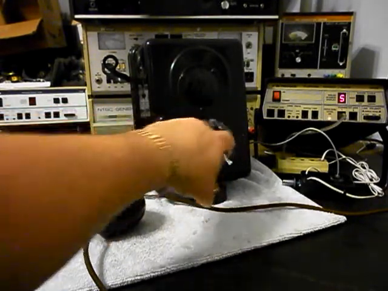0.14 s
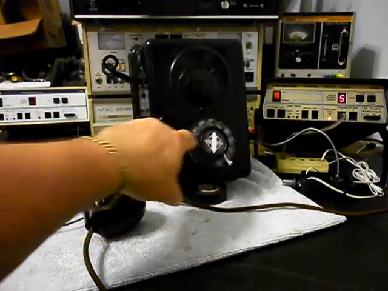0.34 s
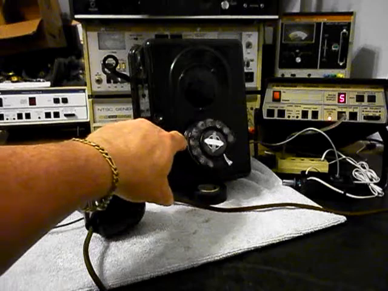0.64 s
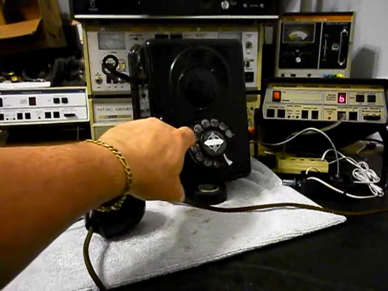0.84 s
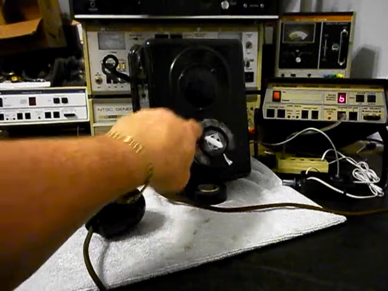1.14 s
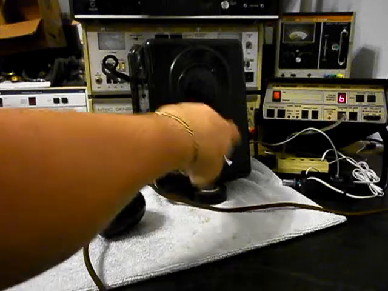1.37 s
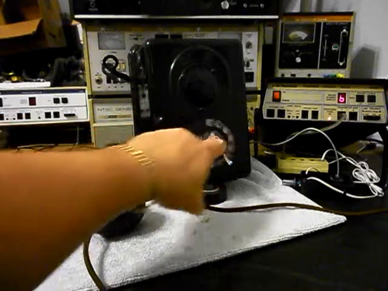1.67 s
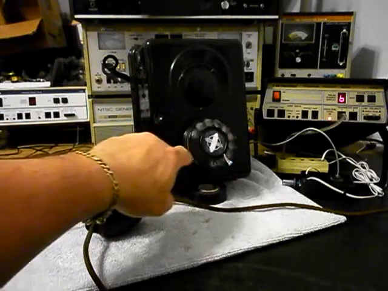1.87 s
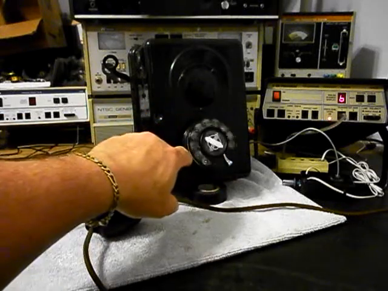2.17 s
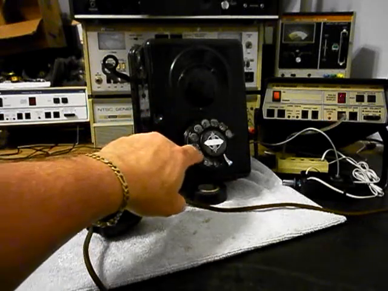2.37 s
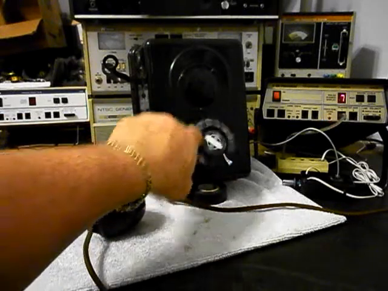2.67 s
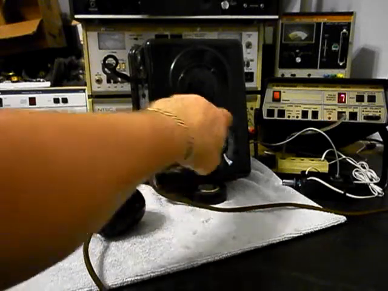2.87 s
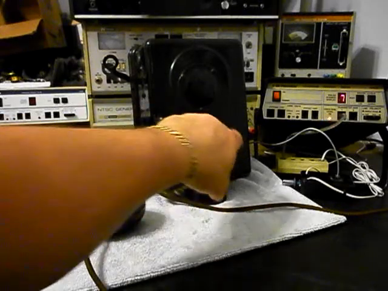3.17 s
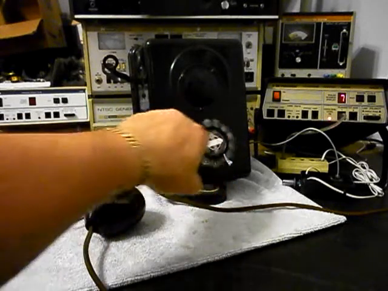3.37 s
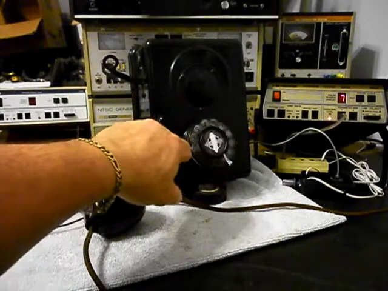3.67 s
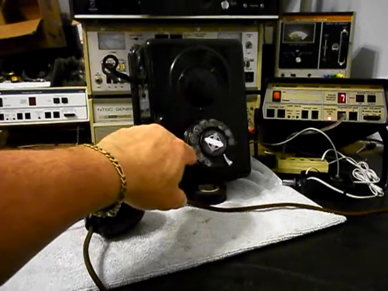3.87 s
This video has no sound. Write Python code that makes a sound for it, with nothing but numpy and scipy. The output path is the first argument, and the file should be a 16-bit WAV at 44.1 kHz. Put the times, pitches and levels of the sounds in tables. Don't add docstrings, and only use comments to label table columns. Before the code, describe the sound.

An old rotary telephone dial is wound and released digit by digit, clicking ratchet, hard knock, rapid ticking whir home, double-click stop, faint hiss.

```python
import sys
import numpy as np
from scipy import signal
from scipy.fft import rfft, irfft
from scipy.io import wavfile
from scipy.ndimage import uniform_filter1d

SR = 44100
rng = np.random.default_rng(int(sys.argv[2]) if len(sys.argv) > 2 else 0)


def generate_wav(sig):
    pcm = np.round(np.clip(np.atleast_2d(sig).T, -1, 1) * 32767).astype(np.int16)
    wavfile.write(sys.argv[1], SR, pcm)


def linear_from_db(decibels):
    return 10 ** (np.asarray(decibels, float) / 20)


N = 176744
LEAD = 4410

# first contact pulse in seconds, first gap in seconds, number of pulses.
RETURNS = [
    (-.012, .09106, 7),
    (1.488, .09093, 8),
    (3.069, .09007, 9),
]
# plain tooth in dB, contact tooth in dB, case boom relative to the tooth in dB, whir in dB.
GEARS = [(-28, -26.5, -17, -48), (-25.5, -24, -13, -46.5), (-26, -22.5, -20, -45)]
# stop in seconds, its peak in dB, delay of the rebound in seconds, peak of the rebound in dB.
STOPS = [(.634, -7.5, .015, -7), (2.2296, -6.5, .0137, -4.5), (3.8979, -5.5, .0141, -4.5)]


def evened(x):
    return x / np.sqrt(np.mean(x ** 2) + 1e-20)


def read(points, hz):
    f, value = np.transpose(points)
    return np.interp(np.log(hz + 1), np.log(f + 1), value)


def colour(x, points):
    hz = np.fft.rfftfreq(len(x), 1 / SR)
    gain = linear_from_db(read(points, hz)) * (hz <= points[-1][0])
    return irfft(rfft(x) * gain, len(x))


def add(mix, s, sound):
    part = mix[LEAD + round(s * SR):][:len(sound)]
    part += sound[:len(part)]


def alike(rows, kind):
    boom_db, t60, tilt_db, ring_db = kind
    return [(s, db, boom_db, t60, tilt_db, db + ring_db) for s, db in rows]


def strike(rows, rise_s):
    forces = np.zeros((3, N + LEAD))
    t = np.arange(4096) / SR
    hz = np.fft.rfftfreq(len(t), 1 / SR)
    octaves = np.log2(np.clip(hz, 1500, 8000) / 3500)
    slow_part = np.exp(-((hz - 800) / 750) ** 2)
    for s, db, boom_db, t60, tilt_db, ring_db in rows:
        sharp, slow = rng.standard_normal((2, len(t)))
        sharp = irfft(rfft(sharp) * linear_from_db(tilt_db * octaves))
        slow = irfft(rfft(slow) * slow_part)
        shape = linear_from_db(-60 * t / max(t60, .004)) * np.minimum(t / rise_s, 1)
        energy = linear_from_db(db) * np.linalg.norm(shape) / np.sqrt(len(t))
        add(forces[0], s, 0.52 * energy * evened(sharp * shape))
        add(forces[1], s, 0.19 * energy * linear_from_db(boom_db + 4) * evened(slow * shape))
        add(forces[2], s, linear_from_db(ring_db) * np.hanning(14))
    return forces


def sliding(tables, grain_db):
    forces = np.zeros((2, N + LEAD))
    for rows in tables:
        s, db, dull_db = np.transpose(rows)
        t = np.arange(s[0], s[-1], 1 / SR)
        sharp, dull, catches = rng.standard_normal((3, len(t)))
        grain = linear_from_db(grain_db * evened(uniform_filter1d(catches, 90)))
        level = linear_from_db(np.interp(t, s, db)) * signal.windows.tukey(len(t), .03)
        add(forces[0], s[0], evened(sharp * grain) * level)
        add(forces[1], s[0], evened(dull * grain) * level * linear_from_db(np.interp(t, s, dull_db)))
    return forces


def body(x, modes, broad_db, lo_hz, hi_hz, opposed=False):
    t = np.arange(8192) / SR
    ring = np.zeros(len(t))
    for k, (hz, width, db) in enumerate(modes):
        sign = (-1) ** (k * opposed)
        ring += sign * linear_from_db(db) * np.sqrt(width) * np.exp(-np.pi * width * t) * np.sin(2 * np.pi * hz * t)
    band = signal.butter(2, [lo_hz, hi_hz], "band", fs=SR, output="sos")
    broad = signal.sosfilt(band, 1. * (t == 0))
    both = ring / np.linalg.norm(ring) + linear_from_db(broad_db) * broad / np.linalg.norm(broad)
    return signal.oaconvolve(x, both / np.linalg.norm(both))[:len(x)]


def workshop():
    # frequency in Hz, level in dB per Hz.
    hiss = [(15, -29), (25, -24), (265, -1.5), (313, -6), (371, -2.5), (450, -8), (1900, -24), (2310, -15),
            (3930, -20.5), (6840, -35.5), (7900, -50.5), (10300, -68.5), (17400, -120)]
    # frequency in Hz, rms level in dB.
    hum = [(120.6, -63.5), (88, -71)]
    t = np.arange(N) / SR
    out = linear_from_db(-56) * evened(colour(rng.standard_normal(N), hiss))
    for hz, db in hum:
        waver = 1 + .45 * evened(uniform_filter1d(rng.standard_normal(N), 3000))
        out += np.sqrt(2) * linear_from_db(db) * waver * np.sin(2 * np.pi * hz * t)
    return out


def knocks():
    # slip in seconds, its peak in dB, knock in seconds, its peak in dB, shell ring in dB.
    releases = [(-.05, -5, -.018, -5, -5), (1.4436, -6.5, 1.4792, -.5, 2.5), (3.039, -5, 3.0626, 2.5, 3)]
    # time in seconds, peak in dB.
    chatters = [(-.008, -1), (1.380, -16), (1.488, -11), (3.016, -38), (3.029, -18)]
    # time in seconds,
    # peak in dB, case boom relative in dB, shell ring relative in dB.
    landings_and_bounces = [(1.3456, -27, 1, 9), (1.352, -8, -12, -6), (1.5104, -18, -15, 6), (2.9175, -30, 9, 19),
                            (2.9253, -38, 10, 17), (3.068, -16, 10, -6)]
    # case boom relative in dB, time to fall 60 dB in seconds,
    # brightness in dB per octave, shell ring relative in dB.
    stop = (-12, .026, -2, -20)
    rebound = (-16, .038, 2.5, -30)
    slip = (-23, .045, 3, -36)
    knock = (-12, .03, -.5, 0.3)
    chatter = (-22, .035, 4, -18)
    rows = alike([r[:2] for r in releases], slip)
    rows += [(s, db, *knock[:3], ring_db) for _, _, s, db, ring_db in releases]
    rows += alike(chatters, chatter)
    rows += [(s, db, boom_db, .04, 1.5, db + ring_db) for s, db, boom_db, ring_db in landings_and_bounces]
    rows += alike([r[:2] for r in STOPS], stop)
    rows += alike([(s + wait_s, db) for s, _, wait_s, db in STOPS], rebound)
    return strike(rows, rise_s=0.00097)


def teeth():
    jitter_s, spread_db = .0006, 1.2
    t60, tilt_db, shell_db = .045, -2.5, -45
    rows = []
    for (s, gap, pulses), (tooth_db, contact_db, boom_db, _) in zip(RETURNS, GEARS):
        turn = np.arange(1, 4 * pulses) / 4
        chance = rng.standard_normal((len(turn), 2)) * [jitter_s, spread_db]
        times = s + gap * turn + .0004 * turn ** 2 + chance[:, 0]
        fading_db = tooth_db - 4 * turn / pulses
        levels = np.where(turn % 1 == 0, contact_db, fading_db) + chance[:, 1]
        booms = boom_db + 9 * turn / pulses
        rows += [(at, db, boom, t60, tilt_db, shell_db) for at, db, boom in zip(times, levels, booms)]
    return strike(rows, rise_s=.0025)


def whir():
    tables = []
    for (s, *_), (home, *_), (*_, whir_db) in zip(RETURNS, STOPS, GEARS):
        share = np.linspace(0, 1, 9)
        start = s + .02
        times = start + share * (home - start)
        levels = whir_db - 4 * (2 * share - 1) ** 2
        dull_db = -5 + 6.5 * share
        tables.append(np.transpose([times, levels, dull_db]))
    return sliding(tables, grain_db=1.2)


def scrape():
    # time in seconds, level in dB.
    pulls = [
        [(.78, -68), (1.0, -76), (1.07, -57), (1.15, -68), (1.25, -61), (1.3, -65), (1.345, -48)],
        [(2.4, -62), (2.54, -68), (2.62, -55), (2.7, -52), (2.8, -59), (2.915, -50), (2.95, -68), (3.0, -66),
         (3.027, -42)],
    ]
    pull_dull_db = [3, -1]
    drag = [[(s, db, dull_db) for s, db in rows] for rows, dull_db in zip(pulls, pull_dull_db)]
    return sliding(drag, grain_db=2.2)


def ticks():
    # time in seconds, peak in dB.
    taps = [(.8104, -44), (.917, -46), (1.03, -42), (2.1689, -31), (2.4144, -47), (2.5485, -44),
            (3.7009, -38), (3.7677, -30)]
    clicks = [(.9222, -36), (1.034, -27), (1.062, -19), (1.0808, -17.5), (1.1711, -26), (1.214, -27),
              (1.2679, -36), (1.3073, -32)]
    grits = [(1.7453, -30), (2.1255, -32), (3.3267, -28), (3.7009, -29), (3.768, -26), (3.7917, -36)]
    soft_clicks = [(2.5635, -36), (2.593, -28), (2.6094, -30), (2.6583, -31), (2.6897, -34), (2.7466, -34),
                   (2.786, -28), (2.8329, -29), (2.8678, -32), (2.8997, -36)]
    # case boom relative in dB, time to fall 60 dB in seconds,
    # brightness in dB per octave, shell ring relative in dB.
    tap = (8, .05, -1, -6)
    ratchet = (-9, .028, 0.3, -24)
    grit = (-27, .11, 1.5, -20)
    soft_ratchet = (-13, .055, 1, -12)
    rows = alike(taps, tap) + alike(clicks, ratchet) + alike(grits, grit) + alike(soft_clicks, soft_ratchet)
    return strike(rows, rise_s=0.0023)


def room(x):
    # frequency in Hz, time to fall 60 dB in seconds.
    echo_times = [(300, 0.46), (1000, 0.37), (3000, 0.37), (7000, 0.38)]
    taps = np.zeros(SR // 2)
    at = np.arange(120, len(taps) - 12, 12)
    taps[at + rng.integers(0, 12, len(at))] = rng.choice([-1., 1.], len(at))
    hz, t, z = signal.stft(taps, SR, nperseg=256)
    fade = linear_from_db(-60 * t / read(echo_times, hz)[:, None])
    tail = signal.istft(z * fade, SR, nperseg=256)[1]
    return signal.fftconvolve(x, tail / np.linalg.norm(tail))[:len(x)]


def scene():
    # frequency in Hz, width in Hz, level in dB.
    metal = [(2251, 92, -2.5), (2560, 240, 7), (3082, 450, 9), (3700, 470, 7), (4525, 100, 7.5),
             (4740, 90, 8), (5443, 630, 7.5), (6200, 580, 0), (6655, 70, 7), (6800, 740, 13.5)]
    pawl = [(2124, 90, 2), (3100, 260, -0.5), (5440, 500, -1.5), (6114, 210, 1.5), (6940, 420, -8)]
    case = [(405, 45, 1), (645, 35, 3), (867, 100, 4.3), (1129, 55, 1.2), (1278, 20, -5.5),
            (1512, 13, -8.5)]
    hollow = [(490, 45, -16), (641, 11.5, 3), (705, 28, 3.5), (790, 35, -6), (860, 45, -4), (986, 40, -6),
              (1115, 40, -7), (1275, 35, -8), (1531, 25, -14)]
    rumble = [(292, 140, 0.1), (385, 30, -1)]
    # frequency in Hz, gain in dB.
    mic = [(60, -33.5), (200, -11), (1000, -5.12), (3400, 0.26), (4000, -4.5), (5000, -0.77), (7000, -2.37),
           (7500, -8.5), (7900, -38.5), (8000, -49.5)]
    background = workshop()
    blows = knocks() + teeth()
    rub = whir() + scrape()
    small = ticks()
    dial = body(blows[0] + rub[0], metal, -0.5, 1350, 6500)
    dial += body(small[0], pawl, -1, 880, 9000)
    dial += body(blows[1] + small[1] + 3 * rub[1], case, 1.5, 420, 1500)
    dial += linear_from_db(1) * body(rub[0], rumble, -14.5, 252, 420)
    shell = body(blows[2] + small[2], hollow, -21, 460, 1300, opposed=True)
    echoes = linear_from_db(-6) * room(dial + linear_from_db(-7) * shell)
    heard = colour(dial + shell + echoes, mic)[LEAD:]
    return (heard + background)[None]


def band_limit(x):
    return signal.sosfilt(signal.butter(12, 9300, fs=SR, output="sos"), x)


def record(dry):
    # frequency in Hz, gain in dB.
    image = [(8000, -3.5), (8300, -5.5), (8700, -19.5), (9100, -34), (9400, -69), (9500, -92)]
    recorder_hz, ceiling = 16000, .97
    held = dry[0] / (1 + abs(dry[0] / ceiling) ** 8) ** (1 / 8)
    held = colour(held, [(20, 0), (recorder_hz / 2, 0)])
    mirror = 2 * held * np.cos(2 * np.pi * recorder_hz * np.arange(N) / SR)
    leak = colour(mirror, [(7900, -120)] + image)
    return band_limit((held + leak)[None])


dry = scene()
out = record(dry)
generate_wav(out)
```